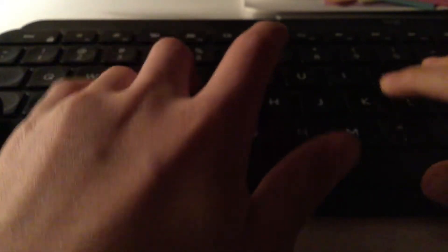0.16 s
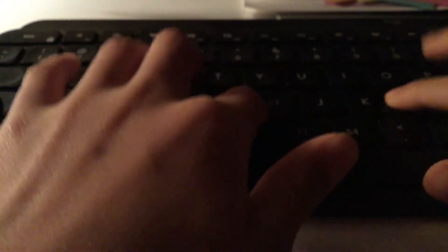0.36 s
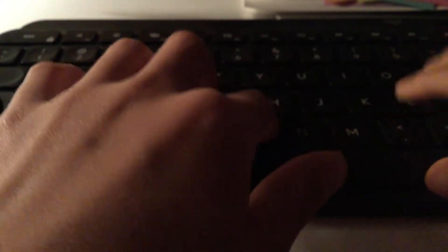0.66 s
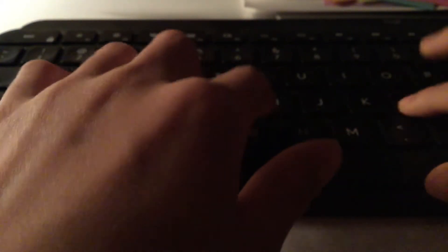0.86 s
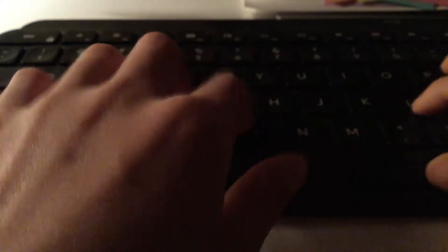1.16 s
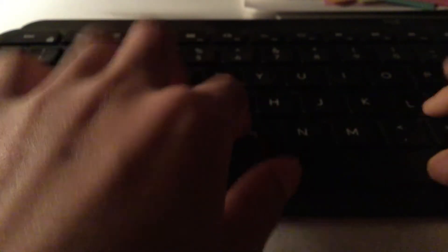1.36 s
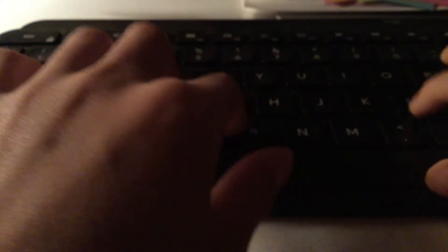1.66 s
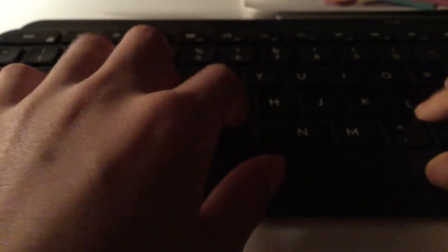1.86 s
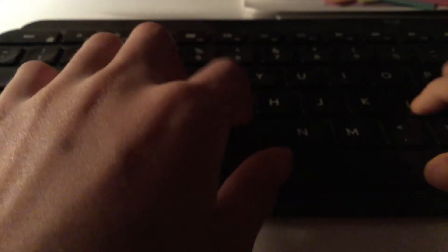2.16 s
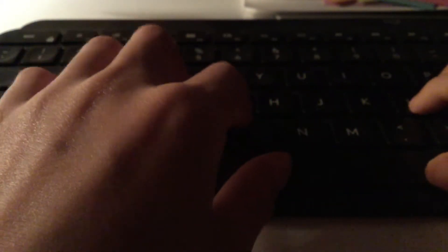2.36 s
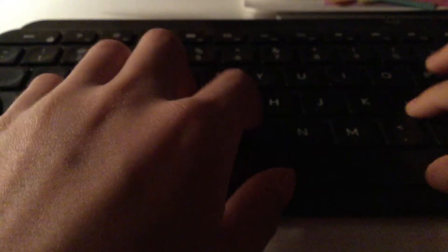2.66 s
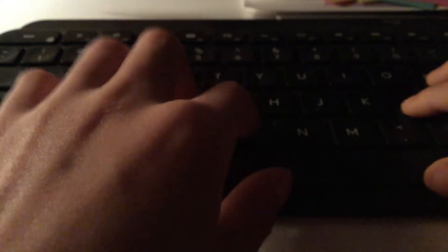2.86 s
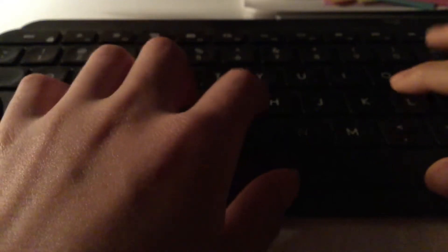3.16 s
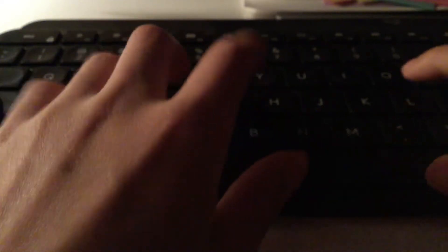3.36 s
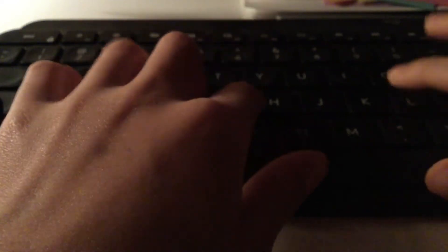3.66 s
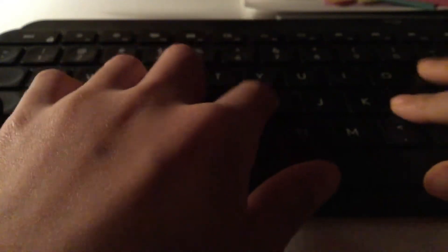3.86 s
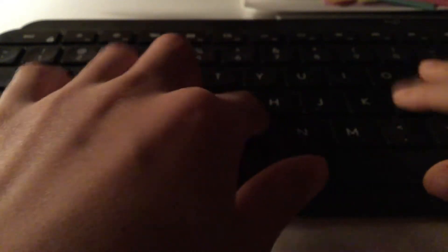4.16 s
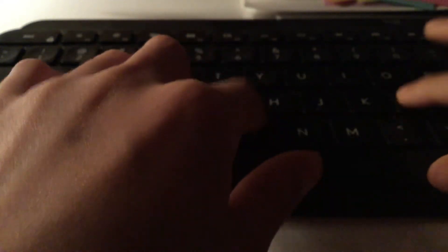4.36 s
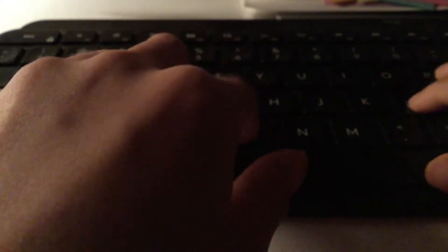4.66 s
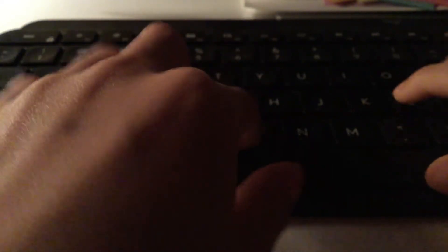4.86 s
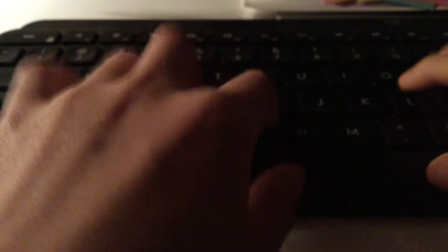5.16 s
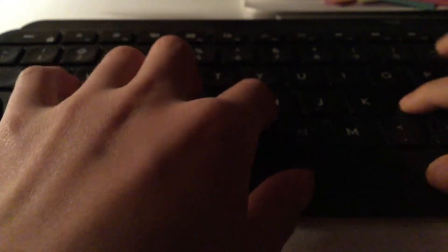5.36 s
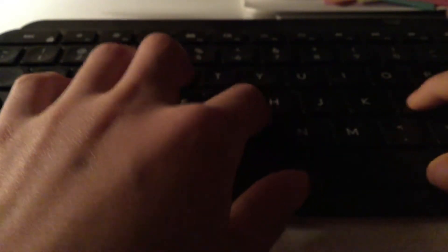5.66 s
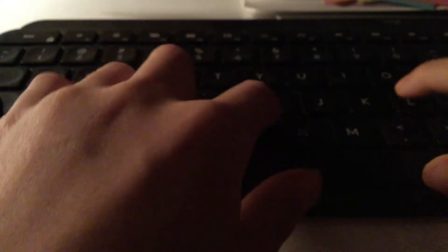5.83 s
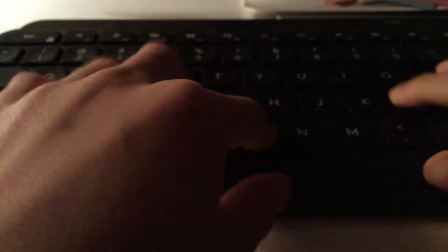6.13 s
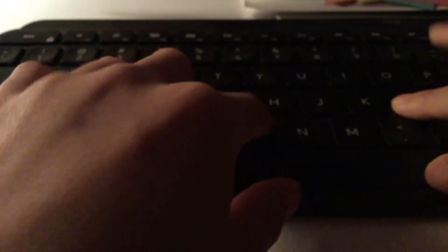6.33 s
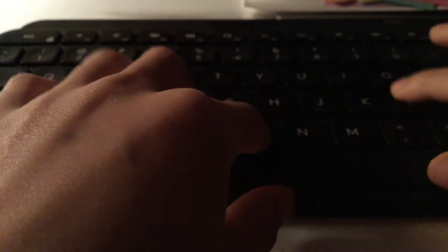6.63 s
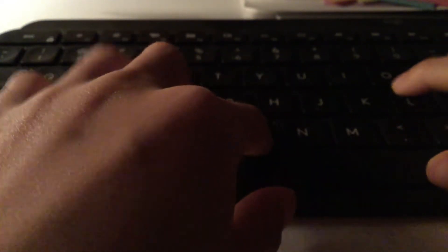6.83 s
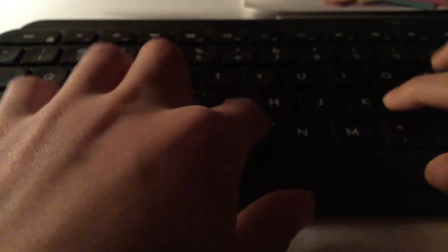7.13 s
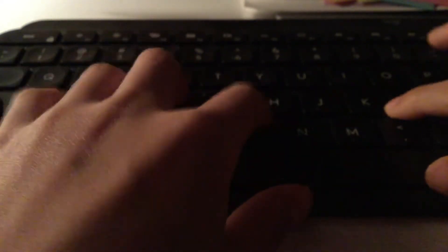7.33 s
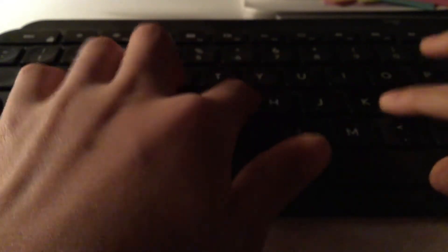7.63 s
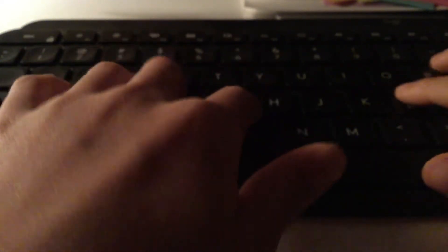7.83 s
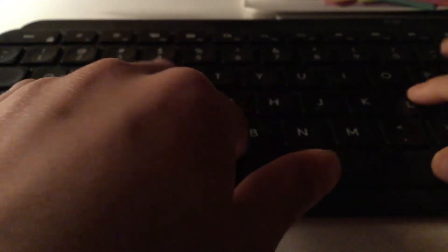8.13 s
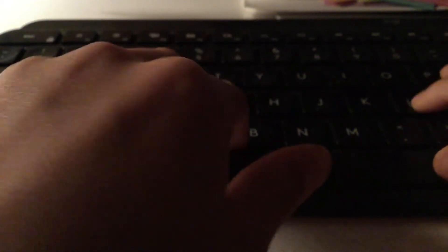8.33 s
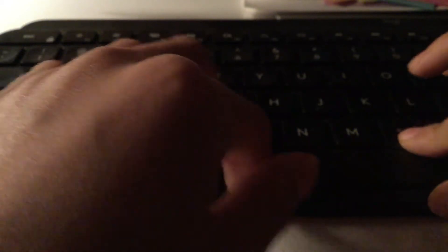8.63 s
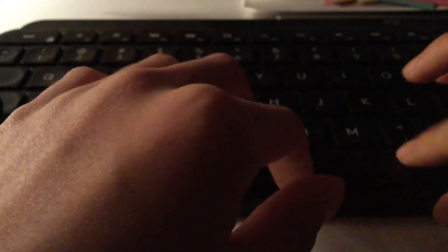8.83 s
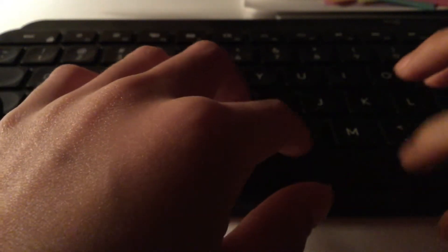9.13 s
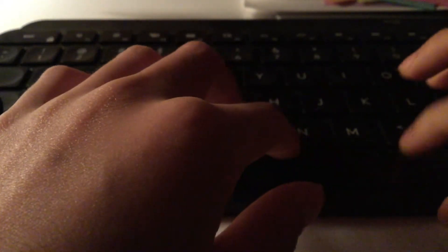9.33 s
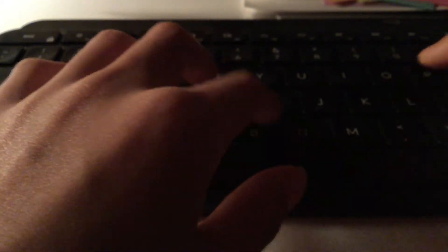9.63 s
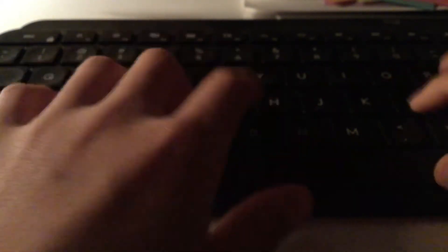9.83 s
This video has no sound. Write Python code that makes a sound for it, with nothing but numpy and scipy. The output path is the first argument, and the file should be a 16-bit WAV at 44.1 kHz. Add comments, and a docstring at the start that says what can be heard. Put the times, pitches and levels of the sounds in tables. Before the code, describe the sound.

Rapid, irregular typing on a computer keyboard heard very close, sharp bright plastic key ticks over soft low thumps in a quiet small room.

```python
"""Fast typing, close by

Keycaps tick sharply: short contact forces excite the uneven modes of each cap.
Each stroke also drives the resonances of desk, base plate and hollow case, which thump, knock and clack.
Fingers brush over the caps with stick-slip friction, heard as modulated, coloured noise.
A small room adds a faint decaying tail, over steady room noise and a slow low rumble.
"""
import sys
import numpy as np
from scipy import signal
from scipy.fft import rfft, irfft, next_fast_len
from scipy.io import wavfile
from scipy.ndimage import uniform_filter1d

SR = 44100
rng = np.random.default_rng(int(sys.argv[2]) if len(sys.argv) > 2 else 0)


def unload_audio(sound):
    """Save the sound as a 16-bit wav file, at the path given as the first command line argument."""
    columns = np.transpose(np.atleast_2d(sound))
    # keep every value between -1 and 1, then stretch to whole-number steps
    steps = np.round(np.clip(columns, -1, 1) * 32767)
    wavfile.write(sys.argv[1], SR, steps.astype(np.int16))


N = 440559  # samples

# Keys struck home or springing back. Each row: start in seconds, level of the cap's click in dB,
# level of the desk's thump in dB, level of the case's clack in dB.
STROKES = [(0.061, -23.0, -45.0, -57), (0.086, -44, -35.0, -48), (0.186, -38.5, -49, -57.0),
           (0.223, -47, -35, -50), (0.286, -64, -39.5, -56), (0.358, -37.0, -44.5, -49.5),
           (0.394, -46, -39.5, -54.5), (0.425, -24, -43, -51), (0.462, -43, -37, -52),
           (0.501, -52, -36.5, -47), (0.598, -41, -37.0, -48.5), (0.632, -43.0, -57.0, -46.0),
           (0.66, -40.5, -49, -58), (0.71, -56, -50, -57.0), (0.745, -33, -46, -60),
           (0.792, -34.5, -42, -49.5), (0.817, -48, -50, -52.5), (0.901, -37, -56, -64),
           (0.998, -47.0, -53, -59), (1.048, -30, -41, -48), (1.081, -51, -35.5, -51.5),
           (1.181, -25, -36, -49.5), (1.279, -44, -70, -48), (1.339, -27, -43.5, -49.5),
           (1.37, -31, -47, -48.5), (1.402, -17, -33.5, -51.5), (1.466, -39.0, -39.5, -50.5),
           (1.559, -35, -53, -55.5), (1.581, -33.0, -45, -46.5), (1.661, -40.0, -51, -57.5),
           (1.813, -26.5, -48, -53.5), (1.853, -28, -39.5, -47.5), (1.904, -34, -53, -51),
           (1.948, -37.5, -34.5, -48.5), (1.99, -35.0, -42.5, -53), (2.075, -23, -38.5, -46.5),
           (2.117, -34, -44, -56), (2.161, -54.0, -36.5, -57), (2.192, -29.5, -48, -56),
           (2.243, -39.0, -44, -52), (2.362, -26, -47, -55), (2.488, -25, -45, -55.0),
           (2.529, -43, -29, -44.5), (2.591, -59, -33.5, -48.5), (2.657, -17.5, -38.5, -44.5),
           (2.688, -34, -49, -49), (2.736, -39, -41, -56), (2.771, -14, -34, -41),
           (2.812, -17.5, -38, -47.5), (2.842, -41, -33.5, -53), (2.889, -22.5, -43, -52),
           (3.068, -33.0, -41.5, -55), (3.209, -39.5, -62, -56.0), (3.346, -40.0, -56.0, -49.5),
           (3.387, -31.5, -35, -55), (3.441, -32, -36.5, -50.5), (3.536, -23, -37, -48.5),
           (3.613, -27.0, -31.0, -50.5), (3.656, -33, -49, -53), (3.702, -25.5, -49, -46.5),
           (3.749, -36, -43, -50), (3.795, -41, -43, -55.5), (3.824, -25, -52, -52), (3.875, -58, -41, -59),
           (3.897, -34.5, -43.5, -44.5), (3.984, -37.5, -46.0, -53), (4.027, -27.5, -40.5, -46),
           (4.108, -54, -42, -49), (4.194, -39, -41.5, -50), (4.252, -46, -42.5, -53),
           (4.308, -51, -53, -52), (4.397, -36.5, -53.0, -53), (4.583, -24.5, -42, -53.0),
           (4.621, -24.0, -36, -47.5), (4.691, -37.0, -53, -55.5), (4.767, -31, -38, -47.5),
           (4.853, -40, -45.5, -55), (4.893, -30, -53, -54), (4.94, -35.5, -37.5, -48.5),
           (4.982, -40, -32.5, -44.5), (5.064, -21, -37, -41.5), (5.151, -37.5, -43.5, -51.5),
           (5.202, -26.0, -36, -50.5), (5.274, -34.5, -42, -52), (5.315, -41.0, -38.0, -53),
           (5.369, -40, -40, -55.5), (5.411, -36.5, -47, -57), (5.439, -36, -44.5, -50.5),
           (5.763, -26.5, -37.0, -48.5), (5.852, -41, -34, -41.5), (5.896, -36.5, -42, -50.5),
           (5.926, -51, -39.5, -59.5), (5.984, -41, -47, -53.0), (6.028, -41.0, -34, -46),
           (6.073, -23.0, -42.5, -45), (6.098, -41.0, -42.5, -55), (6.135, -40, -42, -59),
           (6.217, -54, -38, -51.0), (6.288, -45, -39, -44.5), (6.415, -34.5, -36.0, -55),
           (6.447, -34.5, -43, -54), (6.802, -43.0, -58, -55), (6.873, -37, -43, -47.5),
           (6.908, -30, -38, -53.5), (6.956, -54, -36.0, -51), (7.071, -34.5, -42, -51.5),
           (7.136, -31, -43.0, -49), (7.156, -27.5, -41, -57.5), (7.186, -39.0, -44, -53.5),
           (7.282, -47, -48, -53), (7.344, -23.5, -40, -55), (7.369, -31.5, -33.0, -55),
           (7.393, -35, -33, -50.5), (7.432, -54, -41, -49.5), (7.565, -30.0, -47, -57),
           (7.601, -39, -50, -46.5), (7.638, -33.5, -39, -49.5), (7.682, -61, -49.0, -54.5),
           (7.798, -33, -41.5, -47), (7.874, -22, -37.5, -46.5), (7.951, -36.5, -47, -63),
           (8.031, -39.5, -50, -58), (8.083, -42.5, -38, -48), (8.193, -44, -45.5, -51),
           (8.342, -31.5, -41.5, -51.0), (8.553, -39.0, -41.0, -61), (8.604, -42, -41.0, -57),
           (8.668, -10, -31.5, -29.5), (8.734, -33, -59, -37.5), (8.839, -36, -43, -56.0),
           (8.917, -33.5, -32.5, -41.5), (8.971, -29.0, -31.5, -47.5), (9.044, -25.5, -34.5, -45),
           (9.088, -39, -36, -41), (9.148, -31, -37.0, -46.0), (9.247, -19.5, -26, -39.5),
           (9.327, -21.0, -32, -41.5), (9.445, -31.5, -26.5, -39), (9.54, -32, -34, -52),
           (9.693, -35.5, -40.5, -51.5), (9.744, -25.5, -36.5, -50.5), (9.822, -30, -34.5, -50.5),
           (9.896, -36.5, -48.0, -53), (9.939, -51, -42.5, -57.0)]
# How busily the fingers move over the caps. Each row: time in seconds, relative level in dB.
HANDS = [(0.0, -50.5), (0.58, -54.5), (1.05, -56.5), (1.42, -60), (1.67, -53.5), (2.09, -61.5), (2.33, -59),
         (2.45, -66), (2.7, -52), (3.22, -61), (3.39, -72), (3.53, -57), (4.03, -55.5), (4.31, -56),
         (5.09, -56), (5.26, -60), (5.51, -65), (5.67, -56.5), (5.98, -57), (6.12, -72), (6.54, -63.5),
         (6.85, -61.5), (7.01, -56.5), (7.18, -63), (7.84, -46), (8.07, -51), (8.35, -53), (8.85, -65.5),
         (9.82, -61), (9.99, -52)]
# Spectrum of a ringing keycap of middle pitch. Each row: frequency in Hz, relative level in dB.
CAP_SPECTRUM = [(300, -20.5), (1500, -20), (3200, -23), (4500, -14), (5700, -4), (6900, 4.5), (7800, 0.5),
                (9000, -13), (10300, -18), (12000, -22), (13800, -33.5), (16000, -40)]


def amp(db):
    """Amplitude ratio of a level: 20 dB is a factor of ten."""
    return 10 ** (np.asarray(db) / 20)


def unit(x):
    """Normalise a signal to a root-mean-square of 1."""
    return x / np.sqrt(np.mean(x ** 2) + 1e-20)


def along(points, hz):
    """Interpolate (Hz, value) points on a logarithmic frequency axis."""
    point_hz, value = np.transpose(points)
    return np.interp(np.log(hz + 1), np.log(point_hz + 1), value)


def curve(rows):
    """Interpolate (s, value) rows linearly to one value per sample."""
    return np.interp(np.arange(N) / SR, *np.transpose(rows))


def filtered(x, response):
    """Linear filtering: multiply the spectrum of x by a complex response of frequency."""
    n = x.shape[-1]
    padded = next_fast_len(n + 4096)
    hz = np.fft.rfftfreq(padded, 1 / SR)
    return irfft(rfft(x, padded) * response(hz), padded)[..., :n]


def coloured(x, spectrum):
    """Spectral shaping: give x a (Hz, dB) colour, then rms 1."""
    return unit(filtered(x, lambda hz: amp(along(spectrum, hz))))


def resonate(force, modes, vary_db, soft):
    """Modal superposition: each row of force rings the (Hz, width, dB) modes at its own strengths."""
    centre, width, db = np.transpose(modes)[:, :, None]
    sign = (-1) ** np.arange(len(modes))  # neighbouring modes move in opposite phase
    strength = sign * amp(db.T + vary_db * rng.standard_normal((len(force), len(modes))))

    def response(hz):
        ring = 1j * hz * width / (centre ** 2 - hz ** 2 + 1j * hz * width)
        # a soft blow spares the treble
        pad = 1 / (1 + 1j * hz / (soft * centre.max())) ** 2
        return strength @ ring * pad

    return filtered(force, response)


def causal(gain):
    """Minimum phase: by folding the cepstrum, a response with these gains rings only after its blow."""
    cepstrum = irfft(np.log(gain))
    half = cepstrum.shape[-1] // 2
    fold = np.r_[1, np.full(half - 1, 2), 1, np.zeros(half - 1)]
    return np.exp(rfft(cepstrum * fold))


def place(sounds, times, db, window):
    """Energy scaling: lay each row at its time, with the energy of a level db held for window seconds."""
    gain = amp(db) * np.sqrt(window * SR / np.sum(sounds ** 2, axis=1))
    start = np.maximum(np.round(times * SR).astype(int), 0)
    index = start[:, None] + np.arange(sounds.shape[1])
    return np.bincount(index.ravel(), (sounds * gain[:, None]).ravel(), N)[:N]


def background(air_db, rumble_db):
    """Stationary noise: steady coloured room noise, plus low noise whose level drifts as a rumble."""
    # Spectrum of the still room. Each row: frequency in Hz, relative density in dB per Hz.
    air_spectrum = [(20, 8.5), (60, -0.5), (110, -29.5), (180, -6.5), (260, -25), (420, -16), (700, -44),
                    (1500, -46), (4000, -44), (7000, -90), (10000, -49), (16000, -51)]
    # Spectrum of the rumble. Each row: frequency in Hz, relative density in dB per Hz.
    rumble_spectrum = [(5, 2.5), (14, 7.5), (28, -18), (42, -26.5), (58, -2.5), (75, -19), (130, -61.5),
                       (400, -80)]
    # Slow rise and fall of the rumble. Each row: time in seconds, relative level in dB.
    rumble_level = [(0.0, -40), (3.34, -45), (3.45, -40.5), (6.48, -45), (6.73, -54), (6.87, -36),
                    (8.99, -48), (9.85, -37), (9.99, -40)]
    air = amp(air_db) * coloured(rng.standard_normal(N), air_spectrum)
    rumble = coloured(rng.standard_normal(N), rumble_spectrum)
    return air + amp(curve(rumble_level) + rumble_db) * rumble


def fingers(rub_db, rest_db, spread, grain_db, flutter_db):
    """Stick-slip friction: noise with a rough, fluttering level swells and bursts as skin rubs the caps."""
    # Brushing swells and short bursts of rubbing or chatter on the caps. Each row: time of the middle
    # in seconds, relative level in dB, nominal length in seconds.
    brushes = [(0.11, -59, 0.029), (0.234, -49, 0.014), (0.498, -45, 0.039), (0.66, -51, 0.077),
               (0.77, -53.5, 0.075), (1.093, -56.5, 0.033), (1.204, -53, 0.017), (1.296, -52, 0.047),
               (1.456, -50, 0.057), (1.518, -56, 0.043), (2.097, -55, 0.029), (2.535, -56, 0.041),
               (2.887, -46.5, 0.028), (3.067, -50, 0.042), (3.612, -46, 0.0092), (3.897, -56, 0.028),
               (4.039, -47.5, 0.036), (4.096, -53.5, 0.066), (4.446, -60.5, 0.041), (4.512, -56, 0.039),
               (5.196, -44, 0.013), (5.328, -42, 0.02), (5.71, -60, 0.027), (6.141, -50, 0.058),
               (6.25, -44.5, 0.021), (6.992, -51.5, 0.02), (7.1, -51.5, 0.029), (7.343, -49, 0.013),
               (7.65, -54, 0.028), (7.795, -48, 0.023), (7.98, -54, 0.04), (8.134, -54, 0.044),
               (8.361, -52.5, 0.039), (8.545, -53.5, 0.039), (8.64, -54.5, 0.089), (8.74, -42, 0.019),
               (9.435, -33, 0.0062)]
    # Spectrum of skin rubbing on plastic. Each row: frequency in Hz, relative density in dB per Hz.
    skin_spectrum = [(150, -22), (400, 15), (800, 0), (1500, -1), (3000, -9), (4800, -5), (6300, 0),
                     (7600, 3.5), (9200, -10), (12000, -17.5), (14000, -26.5), (16000, -33)]
    t = np.arange(N) / SR
    power = amp(curve(HANDS) + rest_db) ** 2
    for s, db, length in brushes:
        near = slice(max(int((s - 2 * length) * SR), 0), int((s + 2 * length) * SR))
        swell = np.exp(-((t[near] - s) / (spread * length)) ** 2)
        power[near] += amp(db) ** 2 * swell
    # stick and slip roughen the noise; the finger's pressure flutters more slowly
    slips = unit(uniform_filter1d(rng.standard_normal(N), size=40))
    flutter = unit(uniform_filter1d(rng.standard_normal(N), size=500))
    friction = rng.standard_normal(N) * amp(grain_db * slips + flutter_db * flutter)
    return amp(rub_db) * np.sqrt(power) * coloured(friction, skin_spectrum)


def patchy(x, depth_db):
    """Time-varying filtering: the colour drifts, as a finger moves from cap to cap."""
    frames = signal.stft(x, nperseg=256)[2]
    across_hz = uniform_filter1d(rng.standard_normal(frames.shape), size=14, axis=0)
    drift = unit(uniform_filter1d(across_hz, size=24, axis=1))
    return signal.istft(frames * amp(depth_db * drift), nperseg=256)[1][:N]


def contacts(graze_db, graze_scatter_db):
    """Impact: every contact (strokes, grazes, further clicks) has a time s, dB, pitch Hz and length ms."""
    # Further clicks of the caps, played without a thump or clack.
    # Each row: start in seconds, level in dB.
    clicks = [(0.076, -35), (0.101, -41), (0.135, -32.5), (0.237, -32), (0.303, -39), (0.312, -41),
              (0.354, -37.0), (0.438, -30.0), (0.467, -37.0), (0.482, -38), (0.648, -36), (0.73, -28),
              (0.775, -31.5), (1.205, -35.5), (1.22, -43.0), (1.395, -23.5), (1.422, -34), (1.445, -30),
              (1.806, -35), (1.943, -34.5), (2.063, -19), (2.315, -42.5), (2.565, -41.5), (2.65, -19),
              (2.675, -26), (2.775, -37), (2.91, -45), (3.034, -42), (3.047, -30.5), (3.051, -30),
              (3.084, -47), (3.135, -39.5), (3.369, -36), (3.475, -37.5), (3.624, -30), (3.651, -33.5),
              (3.827, -33), (4.003, -44.0), (4.053, -38), (4.122, -40.5), (4.201, -30.0), (4.216, -36.5),
              (4.497, -44), (4.544, -36.0), (4.611, -25.5), (4.795, -35.0), (4.932, -36), (5.014, -38),
              (5.027, -40.0), (5.056, -25), (5.067, -30), (5.11, -38), (5.186, -25), (5.217, -35),
              (5.339, -33), (5.461, -32.5), (5.568, -51.5), (5.608, -44), (5.836, -33), (6.02, -33.5),
              (6.067, -34.0), (6.156, -30.0), (6.23, -40.5), (6.249, -37), (6.425, -29), (6.846, -32.5),
              (6.924, -38.0), (6.991, -42.5), (7.203, -45), (7.337, -30), (7.457, -35.5), (7.528, -38),
              (7.735, -43.0), (7.788, -27.5), (7.896, -40.0), (7.939, -40), (8.11, -41), (8.155, -37.5),
              (8.291, -44.0), (8.532, -42.5), (8.576, -40.5), (8.977, -34), (9.261, -32), (9.427, -21),
              (9.526, -34.5), (9.542, -33), (9.603, -42), (9.814, -21.5), (9.855, -34), (9.921, -42.5),
              (9.976, -19), (9.982, -31)]
    # How the fingers land. Each row: time in seconds, typical length of the contact in ms,
    # typical pitch of the cap in Hz.
    touch = [(0, 0.52, 7260), (2.7, 0.76, 7030), (4.1, 0.89, 7060), (8.7, 0.47, 6970), (8.95, 1.67, 6760),
             (9.499, 2.34, 6640), (9.7, 0.69, 7000)]
    # around each stroke another finger grazes a cap, mostly just afterwards
    graze_lag_s, graze_spread_s = .014, .014
    # a click that outweighs its clack is higher and longer; no two are alike
    nail_over_case_db, pitch_hz_per_db, log_length_per_db = 15.5, 6.5, .06
    log_length_spread, pitch_spread_hz = .36, 160

    stroke_s, stroke_db, _, case_db = np.transpose(STROKES)
    click_s, click_db = np.transpose(clicks)
    lag_luck, level_luck = rng.standard_normal((len(STROKES), 2)).T
    graze_s = stroke_s + graze_lag_s + graze_spread_s * lag_luck
    graze_level = np.interp(graze_s, *np.transpose(HANDS)) + graze_db + graze_scatter_db * level_luck
    s = np.r_[stroke_s, graze_s, click_s]
    db = np.r_[stroke_db, graze_level, click_db]
    # grazes and further clicks have no clack to compare with
    nail_db = np.pad(stroke_db - case_db - nail_over_case_db, (0, len(s) - len(STROKES)))

    touch_s, touch_ms, touch_hz = np.transpose(touch)
    pitch_luck, length_luck = rng.standard_normal((len(s), 2)).T
    cap_hz = np.interp(s, touch_s, touch_hz) + pitch_hz_per_db * nail_db + pitch_spread_hz * pitch_luck
    stretch = np.exp(log_length_spread * length_luck + log_length_per_db * nail_db)
    length_ms = np.interp(s, touch_s, touch_ms) * stretch
    return s, db, cap_hz, length_ms


def keycaps(rebound, gap, skid_db, chatter_db, chatter_s, touch_db, touch_s, vary_db, size=2048):
    """Impulse excitation: a light touch, a snap, its rebound and the loose cap's chatter ring each cap."""
    middle_hz = 7000  # pitch at which CAP_SPECTRUM applies unshifted
    s, db, cap_hz, length_ms = contacts(graze_db=9, graze_scatter_db=5.0)
    lead = size // 8  # samples before the snap
    t = (np.arange(size) - lead) / SR
    length = np.maximum(length_ms, .2)[:, None] / 1000
    slack = length / np.median(length)  # a loose cap skids and rebounds more

    skid = amp(skid_db) * slack * (t >= 0) * np.exp(-np.abs(t) / length)
    before = amp(touch_db) * np.exp(-np.abs(t) / touch_s)
    after = amp(chatter_db) * np.exp(-np.abs(t) / chatter_s)
    loose = np.where(t < 0, before, after)
    grains = rng.standard_normal((len(s), size)) * (rng.random((len(s), size)) < .05)
    force = skid * rng.standard_normal((len(s), size)) + slack * loose * grains
    force[:, lead] += 1  # the snap
    at_rebound = np.round(t * SR) == np.round(gap * length * SR)
    force += np.minimum(rebound * slack ** 2, 1) * at_rebound

    # every cap has its own pitch and its own uneven set of modes
    hz = np.fft.rfftfreq(size, 1 / SR)
    uneven = signal.resample(rng.standard_normal((len(s), 40)), len(hz), axis=1)
    shifted_hz = hz * middle_hz / cap_hz[:, None]
    ring = causal(amp(along(CAP_SPECTRUM, shifted_hz) + vary_db * uneven))
    return place(irfft(rfft(force) * ring), s - lead / SR, db, window=0.0031)


def jiggle(caps, db, ticks_per_s, hold_s):
    """Sympathetic excitation: the taps shake the neighbouring caps into faint random ticks."""
    fade = np.exp(-1 / (hold_s * SR))
    shake = signal.lfilter([1 - fade], [1, -fade], np.abs(caps))
    ticks = rng.standard_normal(N) * (rng.random(N) < ticks_per_s / SR)
    return amp(db) * shake * coloured(ticks, CAP_SPECTRUM)


def knocks(modes, db, push, rise_s, rattle_s, settle_db, settle_s, delay, vary_db, soft, size=5000):
    """Forced resonance: a push and a short grainy rattle at every stroke ring one part of the keyboard."""
    s = np.transpose(STROKES)[0]
    t = np.arange(size) / SR
    decay = np.exp(-t / rattle_s) + amp(settle_db) * np.exp(-t / settle_s)
    rattle = (1 - np.exp(-t / rise_s)) * decay
    grains = unit(rng.standard_normal((len(s), size)) * (rng.random((len(s), size)) < .2))
    force = grains * rattle / np.linalg.norm(rattle)
    force[:, round(rise_s * SR)] += push
    return place(resonate(force, modes, vary_db, soft), s + delay - .004, db, window=0.022)


def body():
    """Modal radiation: the desk thumps, the base plate knocks and the hollow case clacks."""
    # Resonances of the desk. Each row: frequency in Hz, width in Hz, relative strength in dB.
    desk_modes = [(101.7, 18.6, 3.5), (128, 61.7, -4), (187.9, 27.7, -3)]
    # Resonances of the base plate. Each row: frequency in Hz, width in Hz, relative strength in dB.
    plate_modes = [(321, 19, 1), (397.4, 59, 0.5), (464.4, 40, -1.5), (550, 540, -18.5)]
    # Resonances of the case. Each row: frequency in Hz, width in Hz, relative strength in dB.
    case_modes = [(715, 460, -4), (819, 133, 6), (885, 267, 0.5), (1006, 80, -1), (1315, 57, -2),
                  (1680, 142, -1.5), (1724, 114, 0.5), (2030, 96, -1), (2320, 284, -10), (2876, 180, -7.5),
                  (3330, 420, -7), (4670, 1200, -6), (7000, 1120, 1.5), (11100, 1300, -18)]
    _, _, desk_db, case_db = np.transpose(STROKES)
    # the base plate lies between desk and case, so its level follows both
    share_of_desk, plate_offset_db = 0.35, -2.5
    plate_db = case_db + share_of_desk * (desk_db - case_db) + plate_offset_db
    desk = knocks(desk_modes, desk_db, push=1.43, rise_s=0.00306, rattle_s=0.0097, settle_db=-19,
                  settle_s=0.075, delay=0.00298, vary_db=3.5, soft=3.56)
    plate = knocks(plate_modes, plate_db, push=1.25, rise_s=0.001933, rattle_s=0.013, settle_db=-11.5,
                   settle_s=0.017, delay=0.00232, vary_db=4.0, soft=3.9)
    case = knocks(case_modes, case_db, push=0.067, rise_s=0.0045, rattle_s=0.0033, settle_db=-25,
                  settle_s=0.026, delay=0.000997, vary_db=1.8, soft=0.47)
    return desk + plate + case


def room(x, wet_db, bass_db, count=5):
    """Diffuse reverberation: decaying noise tails, taken in turn for each eighth of a second of sound."""
    # Decay of the room. Each row: frequency in Hz, time to fall by 60 dB in seconds.
    decay_times = [(100, 0.34), (500, 0.12), (2000, 0.049), (7000, 0.17), (14000, 0.17)]
    out = np.zeros(N)
    zone = (np.arange(N) * 8 // SR) % count
    for k in range(count):
        hz, t, frames = signal.stft(rng.standard_normal(SR // 2), SR, nperseg=256)
        decay = amp(-60 * t / along(decay_times, hz)[:, None])
        tail = signal.istft(frames * decay, SR, nperseg=256)[1]
        tail = tail * (1 - np.exp(-np.arange(len(tail)) / SR / 0.0031))  # gradual build-up
        share = uniform_filter1d((zone == k) * 1., size=400)  # soft-edged turns
        out += signal.fftconvolve(x * share, tail / np.linalg.norm(tail))[:N]
    tilt = [(400, bass_db), (5000, 0.062)]  # Hz, dB
    return amp(wet_db) * filtered(out, lambda hz: amp(along(tilt, hz)))


def scene():
    """Superposition: caps, keyboard body and rubbing fingers add up, close by in a small room."""
    caps = keycaps(rebound=0.17, gap=.9, skid_db=-14, chatter_db=-21.5, chatter_s=0.0025,
                   touch_db=-21, touch_s=0.0021, vary_db=4.0)
    rubbing = fingers(rub_db=3.0, rest_db=-7, spread=0.71, grain_db=2.0, flutter_db=5.5)
    brushing = patchy(rubbing, depth_db=2.0)
    shaken = jiggle(caps, db=-8.0, ticks_per_s=300, hold_s=0.032)
    keyboard = caps + shaken + body() + brushing
    reverberation = room(keyboard, wet_db=-24.5, bass_db=12)
    return (keyboard + reverberation + background(air_db=-47, rumble_db=0.5))[None]


def record(dry):
    """Saturation and band limiting: the recorder clips at full scale, then cuts the treble steeply."""
    top_hz = 16300  # half-power frequency
    clipped = np.clip(dry, -1, 1)
    return filtered(clipped, lambda hz: 1 / np.sqrt(1 + (hz / top_hz) ** 160))


dry = scene()
out = record(dry)
unload_audio(out)
```